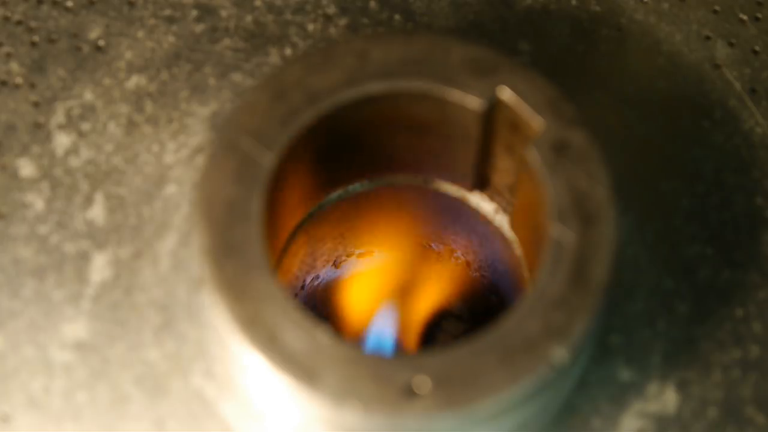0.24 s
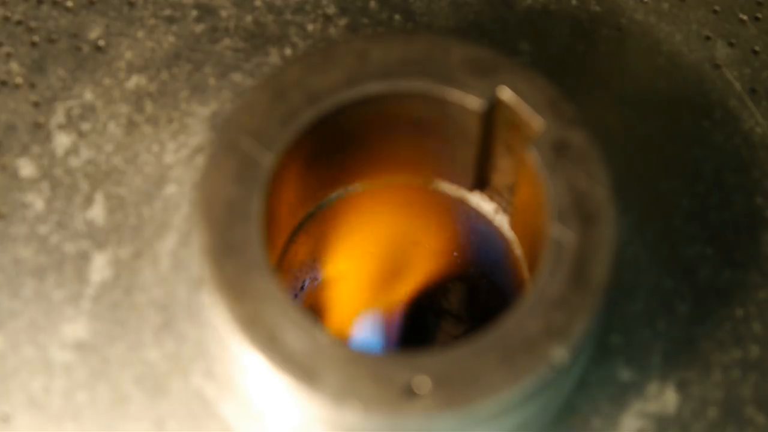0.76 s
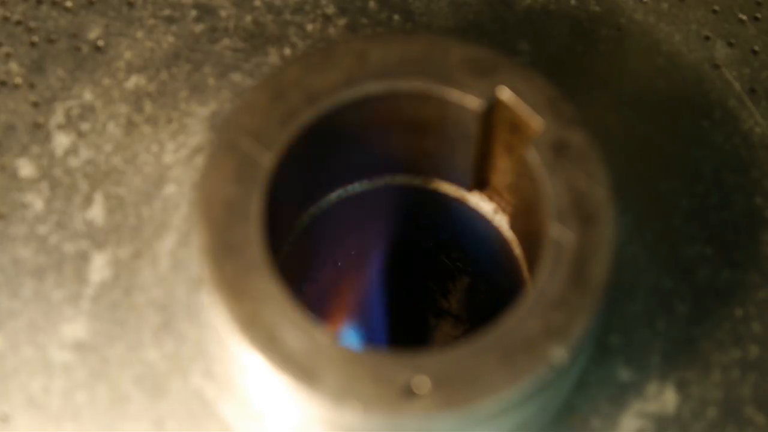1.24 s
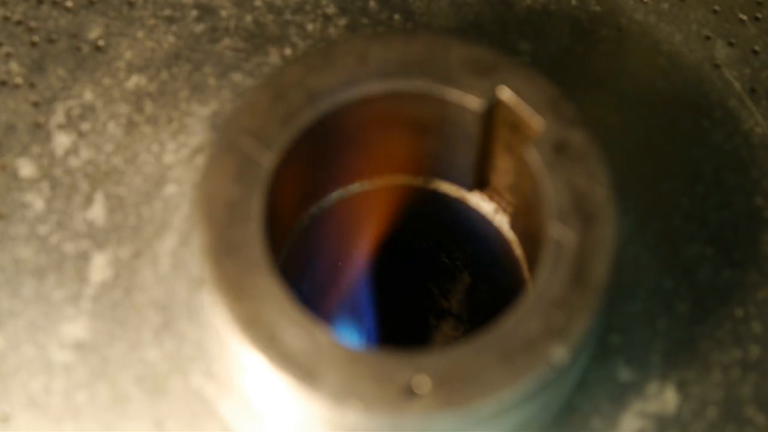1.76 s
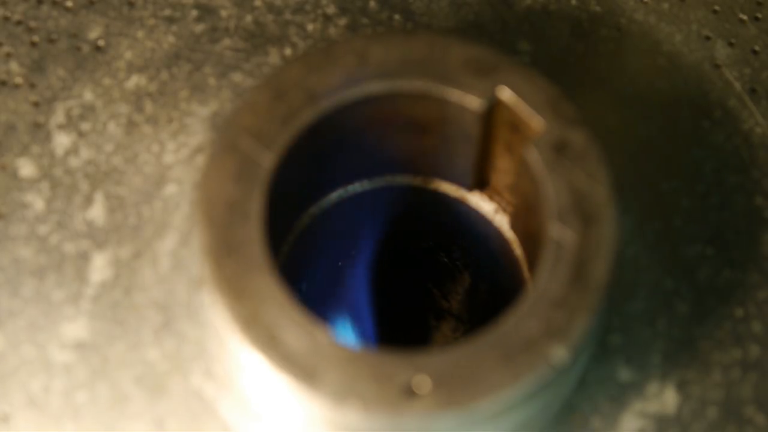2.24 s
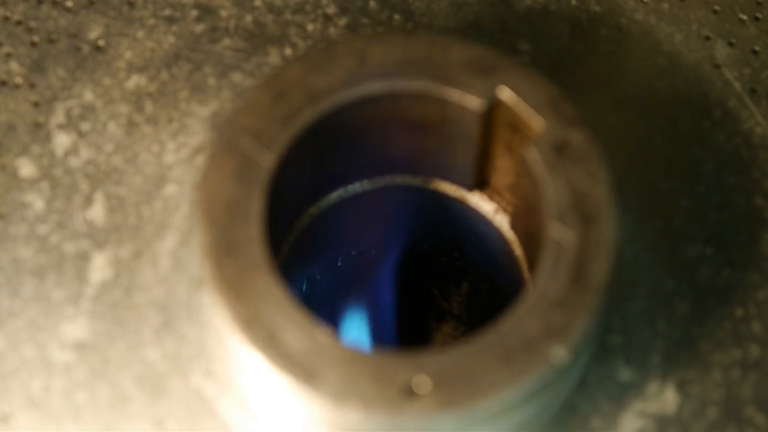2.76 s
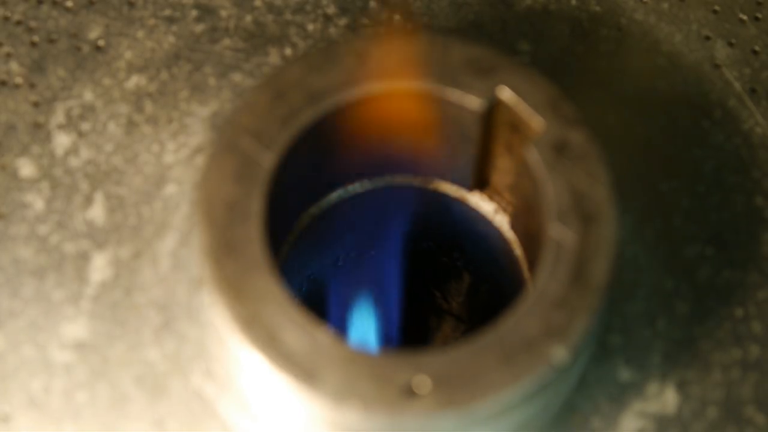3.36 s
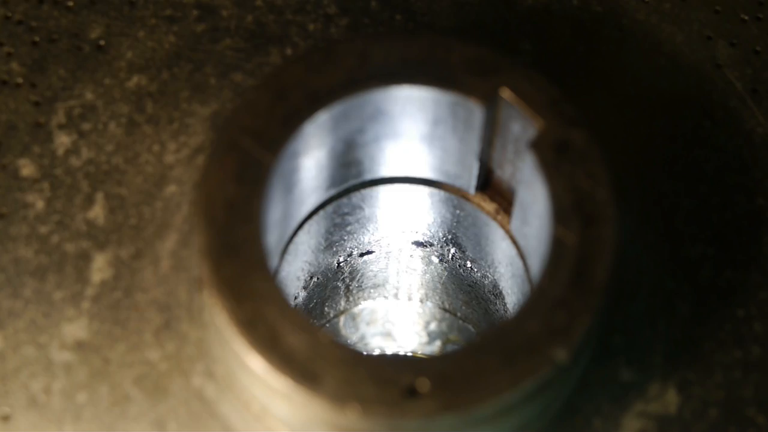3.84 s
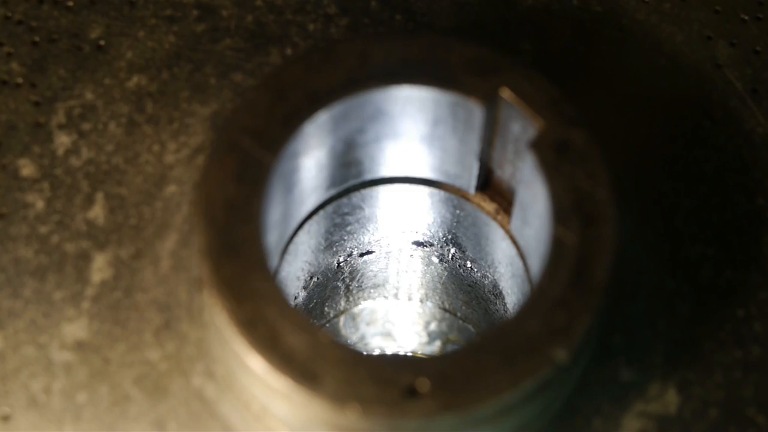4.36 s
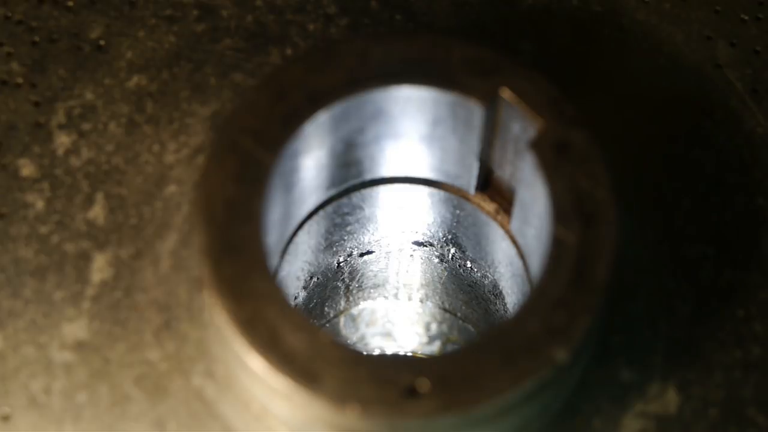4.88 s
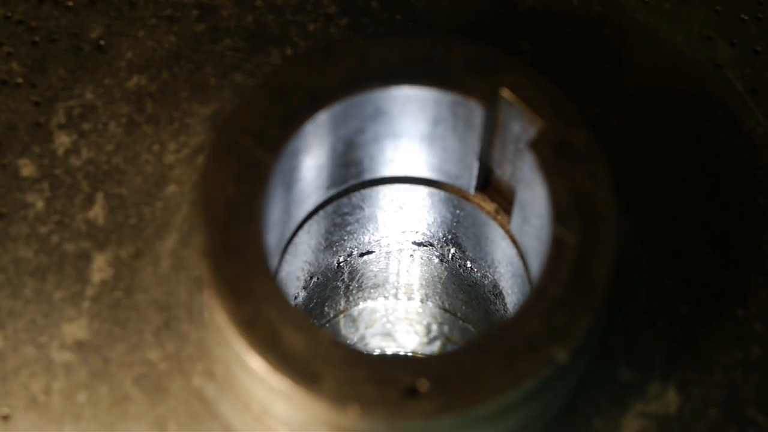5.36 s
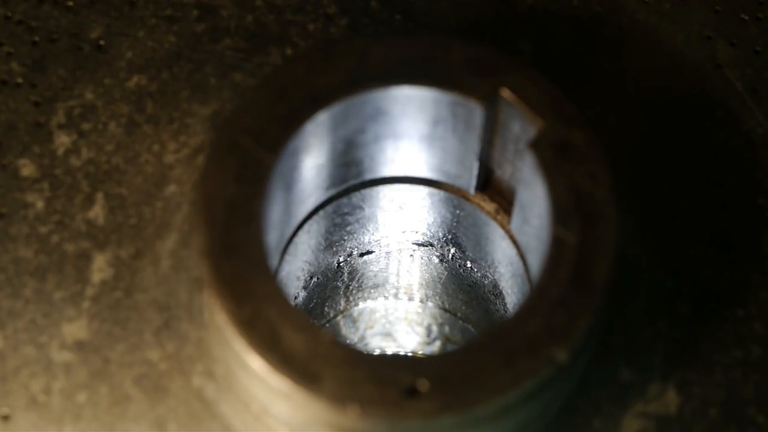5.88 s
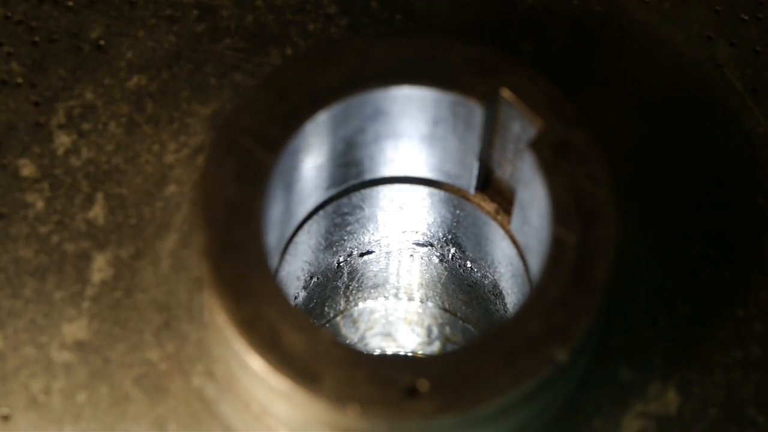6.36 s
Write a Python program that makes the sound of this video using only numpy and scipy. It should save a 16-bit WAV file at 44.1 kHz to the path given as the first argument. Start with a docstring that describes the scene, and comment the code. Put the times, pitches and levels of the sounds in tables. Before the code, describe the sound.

Close hollow torch roar with soft gas hiss and early oil crackles stops abruptly, leaving faint gas, two small clicks and room hush.

```python
"""In a quiet workshop, a gas torch burns close by, inside the bore of a cast-iron pulley. The flame is noise
ringing the hollow hub, swelling briefly at times; the gas jet is resonant hiss. Oily dirt flares up with soft
low puffs of air, small cracks and grainy, sizzling spits of noise. The sound of the flame breaks off abruptly;
a switch clicks (a tick of noise and a ringing housing), a trace of gas rushes on faintly, and the switch clicks
again over the room's wide hush."""
import sys
import numpy as np
from scipy import signal
from scipy.fft import rfft, irfft, next_fast_len
from scipy.io import wavfile
from scipy.ndimage import uniform_filter1d, map_coordinates

SR = 44100
rng = np.random.default_rng(int(sys.argv[2]) if len(sys.argv) > 2 else 0)


def store_pcm(level_fs):
    """Save levels as 16-bit WAV."""
    pcm = np.round(np.clip(level_fs, -1, 1) * 32767).astype(np.int16)
    wavfile.write(sys.argv[1], SR, np.atleast_2d(pcm).T)


N = 291922  # length of the sound in samples
T = np.arange(N) / SR  # time in seconds
OPPOSITE = np.array([[1], [-1]])  # turns one sound into two channels of opposite sign, which sounds wide


def undb(db):
    """Turn decibels into gain."""
    return 10 ** (np.asarray(db) / 20)


def unit(x):
    """Scale a sound to an rms (average strength) of 1."""
    return x / np.sqrt(np.mean(x ** 2))


def noise(gain_at):
    """Make noise of rms 1, coloured by a function that gives the gain at each frequency."""
    size = next_fast_len(N)
    hz = np.maximum(np.fft.rfftfreq(size, 1 / SR), 1)
    spectrum = rfft(rng.standard_normal(size)) * gain_at(hz)
    return unit(irfft(spectrum, size)[:N])


def shaped(points):
    """Make noise of rms 1 whose spectrum runs smoothly through (Hz, dB) points."""
    point_hz, point_db = np.transpose(points)
    return noise(lambda hz: undb(np.interp(np.log(hz), np.log(point_hz), point_db)))


def resonant(modes):
    """Make turbulent noise of rms 1 that rings a set of steep (Hz, width in Hz, dB) resonances."""
    def gain_at(hz):
        power = 0
        for center, width, db in modes:
            detuning = (hz * hz - center * center) / (hz * width)
            power = power + undb(db) ** 2 / (1 + detuning ** 2) ** 2
        return np.sqrt(power)
    return noise(gain_at)


def walk(rate):
    """Make a random curve of rms 1: levels held for 1 / rate seconds, then smoothed twice."""
    hold = max(int(SR / rate), 1)
    steps = np.repeat(rng.standard_normal(N // hold + 1), hold)
    return unit(uniform_filter1d(uniform_filter1d(steps, hold), hold)[:N])


def fall(t, t60):
    """Fade exponentially, losing 60 dB in t60 seconds."""
    return np.exp(-np.log(1000) * t / t60)


def decay(start, t60, rise):
    """Rise quickly and fall exponentially, like anything that is struck."""
    out = np.zeros(N)
    live = (T > start) & (T < start + 2 * t60)
    t = T[live] - start
    out[live] = (1 - np.exp(-t / rise)) * fall(t, t60)
    return out


def mode(start, hz, t60, rise):
    """Ring one struck resonance: a sine of random phase that dies away."""
    return decay(start, t60, rise) * np.sin(2 * np.pi * (hz * T + rng.random()))


def echo(x, t60, wet_db, channels):
    """Add a diffuse echo, a noise tail that starts after a millisecond and fades at the rate of t60."""
    t = T[:SR // 2]
    tail = rng.standard_normal((channels, len(t))) * fall(t, t60) * (t > .001)
    tail /= np.sqrt(np.sum(tail ** 2, axis=1, keepdims=True))
    return x + undb(wet_db) * signal.fftconvolve(np.atleast_2d(x), tail, axes=1)[:, :N]


# Moments when the flame flares with a soft puff.
# Each row: peak in seconds, level in dB, half length in seconds (where the swell is down to 1/e).
PUFFS = [(0.12, -57, 0.019), (0.287, -64, 0.014), (0.505, -54.5, 0.055), (0.657, -57.5, 0.11),
         (0.77, -56, 0.058), (0.943, -51, 0.031), (1.387, -55, 0.024), (1.609, -55, 0.019),
         (2.35, -61, 0.037), (3.27, -59, 0.055), (3.403, -63, 0.026), (3.564, -56.5, 0.014),
         (3.696, -56, 0.0094)]


def flares():
    """Swell with each flare of the flame: smooth bells in time."""
    return sum(undb(db) * np.exp(-((T - peak) / half) ** 2) for peak, db, half in PUFFS)


SWELL_RISE_S, SWELL_T60_S = 0.0017, 0.02
DIP_DB, DIP_S, DIP_LEAD_S = -2, 0.011, 0.002  # depth, half length and lead of the dip
# Moments when the roar dips slightly, then swells briefly at the hub's strongest resonances.
# Each row: start in seconds, strength in dB against the steady roar, seconds from start to release.
SWELLS = [(0.187, -1, .016), (0.334, -0.5, .008), (0.479, 2.5, 0.0048), (0.536, 2, .01),
          (0.6396, 6, 0.0022), (0.6712, 3, .012), (0.91, 0.5, 0.0076), (1.07, 1, 0.0057),
          (1.1433, 3, 0.0065), (1.3304, 0, 0.0073), (1.471, 3, 0.0057), (1.603, 4.5, 0.0094),
          (1.814, 5, .006), (2.081, -0.5, 0.004), (2.33, -1, 0.0055), (2.367, 3.5, 0.0027),
          (2.415, 3.5, 0.0053), (2.4534, 2, 0.017), (2.5082, 1.5, 0.0053), (2.6918, 3, 0.0075),
          (3.3024, 7.5, 0.005), (3.5528, 5.5, 0.0086), (3.571, -1, 0.0078), (3.695, 4, 0.0046)]


def swells():
    """Give the push of each swell (attack, hold, release) and, in dB, the dip of the roar at its start."""
    push, dip_db = np.zeros((2, N))
    for start, db, length in SWELLS:
        age = np.clip(T - start, 0, 1)
        attack = 1 - np.exp(-age / SWELL_RISE_S)
        release = fall(np.maximum(age - length, 0), SWELL_T60_S)
        push += undb(db) * attack * release
        distance = (T - start + DIP_LEAD_S) / DIP_S
        dip_db += DIP_DB * np.exp(-np.minimum(distance ** 2, 20))
    return push, dip_db


# Band of the hub's strongest resonances, where the roar swells: lower and upper limit in Hz.
SWELL_BAND_HZ = (1090, 1383)


def swelling(ring, low_share=0.195, hub_hz=(750, 1800)):
    """Let the roar dip, then add an even, brief swell at the hub's strongest resonances."""
    push, dip_db = swells()
    upper_band = signal.butter(2, SWELL_BAND_HZ, "band", fs=SR, output="sos")
    upper = signal.sosfiltfilt(upper_band, ring)
    # keeping only the phase of the ringing gives an even strength
    phase = np.angle(signal.hilbert(upper, next_fast_len(N))[:N])
    swell = push * np.sqrt(2) * np.cos(phase)
    swell = signal.sosfiltfilt(signal.butter(2, hub_hz, "band", fs=SR, output="sos"), swell)
    # outside the band the dip has only a share of its depth in dB
    return undb(low_share * dip_db) * (ring - upper) + undb(dip_db) * upper + swell


FLAME_DB = -25  # average level of the roar, before surges, flares and swells
SURGE_DB, SURGE_PER_S = 0.56, 17  # rms size and rate of the random surges
FLARE_LIFT_DB = 0.6  # the strongest flare lifts the roar by this much
# Resonances of the flame in the burner tube and hub.
# Each row: frequency in Hz, width in Hz, relative level in dB.
HUB = [(175.3, 42, -30), (282.8, 73, -16), (347, 68, -16), (476.4, 115, -16.5), (548, 49, -13.5),
       (621.5, 40, -11.5), (690.5, 117, -12), (727.6, 29, -13), (817, 37.5, -18.5), (850, 18, -11),
       (917, 43, -14), (975, 79, -13), (1065, 17.6, -4.5), (1100.5, 63, -9), (1159, 25, -8),
       (1225.2, 52.8, -0.5), (1284.5, 37, -6.5), (1290, 97, -11.5), (1440, 124, -16), (1588, 78, -22.5),
       (1628, 18, -21), (1744, 140, -33.5)]


def roar(flutter_db=1.0, flutter_rate=45, scatter_db=-44):
    """Ring the hub with the fluttering flame, with brief swells; a little scatters from the sides."""
    ring = resonant(HUB)
    ring /= np.sqrt(uniform_filter1d(ring ** 2, SR // 12))  # the gas supply holds the mean power steady
    flare = flares()
    burn_db = FLARE_LIFT_DB * flare / flare.max()
    burn_db = burn_db + SURGE_DB * walk(SURGE_PER_S) + flutter_db * walk(flutter_rate)
    scattered = shaped([(60, -43.0), (280, -18.0), (550, -6.5), (740, -0.5), (950, 4.0), (1150, 6.5),
                        (1400, -1), (1750, -8), (2200, -27.0), (4000, -65.0)])
    return undb(FLAME_DB) * swelling(undb(burn_db) * ring) + undb(scatter_db) * scattered * OPPOSITE


NOZZLE_WANDER, NOZZLE_WANDER_PER_S = .014, 22  # share by which the resonances drift (rms), and its rate
SWELL_HISS_DB = 0.7  # the hiss lifts with each swell of the roar, per unit of push
# Resonances of the gas jet in the nozzle.
# Each row: frequency in Hz, width in Hz, relative level in dB per Hz of width.
NOZZLE = [(1970, 1900, -14), (2470, 860, -8), (3097, 430, 0.1), (4008, 430, -3.5), (4610, 500, -8.5),
          (5215, 660, -9.5), (6200, 1500, -17), (8320, 2100, -20), (9900, 2000, -22.5), (12100, 4500, -25)]
# Level of the hiss, which eases off.
# Each row: time in seconds, level in dB before flicker and swells.
HISS_DB = [(0, -45.5), (1.3, -46.5), (2.0, -47), (3.2, -46.5), (3.85, -49)]


def jet(flicker_db=0.74, own_flicker_db=1.23, side_db=-5.0):
    """Hiss through drifting, flickering nozzle resonances; near iron combs it, far walls widen it."""
    hiss = np.zeros(N)
    for hz, width, db in NOZZLE:
        flicker = undb(db + own_flicker_db * walk(30.11))
        hiss += flicker * np.sqrt(width) * resonant([(hz, width, 0)])
    # reading the hiss slightly early or late bends its pitch
    drift = np.cumsum(NOZZLE_WANDER * walk(NOZZLE_WANDER_PER_S))
    hiss = map_coordinates(hiss, [np.arange(N) + drift], order=3, mode="mirror")
    direct = unit(echo(hiss, t60=0.1, wet_db=-7.0, channels=1))
    reflected = shaped([(900, -37.5), (1800, -2), (2500, 0.5), (4200, -1.5), (5500, -3.5), (7000, -7.5),
                        (10000, -11), (14000, -17.0), (15500, -18.0)])
    push, _ = swells()
    flow_db = np.interp(T, *np.transpose(HISS_DB)) + flicker_db * walk(60) + SWELL_HISS_DB * push
    return (direct + undb(side_db) * reflected * OPPOSITE) * undb(flow_db)


def puffs(rumble_db=-85):
    """Push out a little low-pitched air with each flare, over the flame's faint rumble."""
    air = shaped([(5, -12), (20, -1), (60, 0.5), (110, -2.0), (200, 2.0), (600, -44), (2000, -90)])
    return air * (flares() + undb(rumble_db))


# Hush of the workshop, the part common to both channels.
# Each row: frequency in Hz, relative level in dB per Hz.
HUSH_MID = [(30, -25), (100, -22.5), (170, -17.5), (240, -7.5), (330, -3.5), (550, 0), (800, 0),
            (1300, -4.5), (2000, -6.5), (4000, -10.5), (7000, -16), (10000, -20), (15500, -27.5)]
# The part of the hush that is opposite in the two channels.
# Each row: frequency in Hz, relative level in dB per Hz.
HUSH_SIDE = [(30, -23), (100, -32), (170, -25), (240, -23.5), (330, -9.5), (550, -4.5), (850, -2.5),
             (1400, -4.5), (2000, -6), (4000, -13), (7000, -21), (10000, -27), (15500, -36)]


def hush(mid_db=-59.5, side_db=-52, waver_db=0.8):
    """Fill the background with wide, gently wavering air noise."""
    air = undb(mid_db) * shaped(HUSH_MID) + undb(side_db) * shaped(HUSH_SIDE) * OPPOSITE
    return air * undb(waver_db * walk(11.0))


SPIT_RISE_S, SPIT_T60_S = 0.0026, 0.067  # every spit bursts and dies alike
SIMMER_DB, SIMMER_LEAD_S, SIMMER_TAIL_S = -36, 0.013, 0.062  # fizz around each spit; time constants


def spit_shape(start):
    """Follow a drop of oil as it begins to fizz, bursts, and fizzes out."""
    age = T - start
    simmer = np.exp(-np.maximum(-age / SIMMER_LEAD_S, age / SIMMER_TAIL_S))
    return decay(start, SPIT_T60_S, SPIT_RISE_S) + undb(SIMMER_DB) * simmer


# the sizzle is partly separate tiny bursts: their rate, time constant and share of the power
CRACKLE_PER_S, CRACKLE_LIFE_S, CRACKLE_SHARE = 450, 0.00049, .42


def crackle():
    """Give the ragged strength of a sizzle: tiny bubbles bursting at random over an even fizz."""
    pops = 1. * (rng.random(N) < CRACKLE_PER_S / SR)
    power = signal.lfilter([1], [1, -np.exp(-1 / (CRACKLE_LIFE_S * SR))], pops)
    return np.sqrt(1 - CRACKLE_SHARE + CRACKLE_SHARE * power / power.mean())


CRACK_RISE_S, CRACK_T60_S = 0.00026, 0.0041  # the skin of the drop bursts first
CRACK_BRIGHTNESS = 0.46  # share of a spit's treble setting in dB that its crack has too
# Colour of a spit in the bore.
# Each row: frequency in Hz, width in Hz, relative level in dB.
SIZZLE = [(3180, 810, -12.5), (3780, 130, -0.5), (4992, 12600, -2.5), (6160, 620, 3), (8300, 2330, -2.5),
          (10330, 1000, -0.5), (11700, 2300, -0.5), (14600, 2000, -20)]
# Brief ringing of the bore after each crack.
# Each row: frequency in Hz, level in dB against the crack setting, time to fall by 60 dB in seconds.
BORE = [(3130, -10, 0.016), (3950, -10.5, 0.03), (6370, -13, 0.015)]
# Oil spitting on hot iron.
# Each row: start in seconds, sizzle level in dB, its treble against its body in dB, opening crack in dB.
SPITS = [(0.1167, -29.5, -9, -30), (0.291, -42, -4.5, -45.5), (0.4702, -30, -1, -34),
         (0.4759, -20.5, -4.5, -15), (0.482, -38, -5, -32), (0.498, -48, -2, -38.5), (0.513, -47.5, 4, -43),
         (0.5378, -33, -18.5, -31), (0.622, -46, 6, -50), (0.639, -49, 1.5, -42.5),
         (0.6525, -24.5, -3.5, -26), (0.659, -35, 1, -27.5), (0.6698, -31.5, -1, -29), (0.684, -36, 6, -30),
         (0.6923, -31.5, 14.5, -17), (0.698, -46, 16.5, -30), (0.7115, -51, 11, -46), (0.8939, -49, 8, -48),
         (0.9284, -38.5, -2, -33), (0.936, -37, -3, -42), (1.392, -50, 2, -37), (1.603, -51, 3, -37),
         (1.611, -55, 1, -46), (3.2326, -27.5, -28, -25.5)]


def spits(side_db=-6, split_hz=5500, crack_treble_db=-3):
    """Crack open droplets of oil that ring the bore and sizzle in grains, some bright and some dull."""
    sizzle = resonant(SIZZLE) + undb(side_db) * resonant(SIZZLE) * OPPOSITE
    snap = sizzle / np.sqrt(uniform_filter1d(sizzle ** 2, size=24))  # a crack is one solid burst
    lowpass = signal.butter(2, split_hz, fs=SR, output="sos")
    body = signal.sosfiltfilt(lowpass, sizzle)
    snap_body = signal.sosfiltfilt(lowpass, snap)
    # strength over time of the body and treble of sizzles and cracks, and the blows to the bore
    low, high, crack_low, crack_high, blows = np.zeros((5, N))
    for start, db, treble_db, crack_db in SPITS:
        fizz = undb(db) * spit_shape(start)
        crack = undb(crack_db) * decay(start, CRACK_T60_S, CRACK_RISE_S)
        low += fizz
        high += undb(treble_db) * fizz
        crack_low += crack
        crack_high += undb(crack_treble_db + CRACK_BRIGHTNESS * treble_db) * crack
        blows[int(start * SR)] += undb(crack_db)
    bore = sum(undb(db) * mode(0, hz, t60, CRACK_RISE_S) for hz, db, t60 in BORE)[:SR // 10]
    cracks = crack_low * snap_body + crack_high * (snap - snap_body)
    cracks = cracks + signal.fftconvolve(blows, bore)[:N]
    sizzles = crackle() * (low * body + high * (sizzle - body))
    return echo(sizzles + cracks, t60=0.43, wet_db=-13.0, channels=2)


CLICK_WET_DB, CLICK_T60_S = -18.5, 0.36  # level and fading time of the echo
BUILD_S, BUILD_CYCLES = 0.0006, 1.5  # a mode builds up as the blow spreads, the low ones last
# Colour of the tick.
# Each row: frequency in Hz, relative level in dB per Hz.
TICK = [(30, -26), (150, -19), (300, -17), (420, -9), (900, -2), (1300, -1.5), (2000, -2), (2800, -7),
        (3500, -4.5), (5500, -6), (6500, -15), (8600, -20), (10000, -20), (12000, -21), (15500, -34)]
# Ringing modes of the switch housing.
# Each row: frequency in Hz, time to fall by 60 dB in seconds, relative dB in the first click and the second.
HOUSING = [(420.6, 0.089, -6.5, -2.5), (480, 0.063, -1.5, 0), (564, .045, 0.5, 1), (686, 0.056, -10, -14),
           (771, 0.053, -1, 2), (828, .055, 1.5, 1.5), (933, 0.065, -18, -6), (1035, 0.084, -6, -8),
           (1390, 0.11, -12, -9.5), (1690, 0.038, 0, -2), (2020, .045, -17, -17), (2310, .05, -11, -15),
           (2680, 0.047, -3, -3), (2884, 0.037, -7, -1.5), (3280, 0.041, -17, -21), (4140, 0.059, -24, -8),
           (4380, .048, -12, -19), (4667, .052, -7, -17), (5500, .028, -15, -2), (7350, .035, -15, -22),
           (9900, 0.034, -13, -14)]
# Switch clicks, a tick and then the snap.
# Each row: start in seconds, tick level in dB, snap level in dB, delay of the snap in seconds.
CLICKS = [(3.9071, -31, -27.5, 0.0006), (5.0668, -29.5, -28, 0.0012)]


def clicks(side_db=-3, tick_t60=0.073, rise=0.001, lowest_hz=380):
    """Tick the catch, then snap the switch home, ringing its housing a little differently each way."""
    out = np.zeros((2, N))
    small_body = signal.butter(8, lowest_hz, "high", fs=SR, output="sos")  # too small to radiate bass
    for k, (start, tick_db, snap_db, delay) in enumerate(CLICKS):
        tick = shaped(TICK) + undb(side_db) * shaped(TICK) * OPPOSITE
        out += undb(tick_db) * decay(start, tick_t60, rise) * tick
        ring = np.zeros(N)
        for hz, t60, *db in HOUSING:
            ring += undb(db[k]) * mode(start + delay, hz, t60, BUILD_S + BUILD_CYCLES / hz)
        out += undb(snap_db) * signal.sosfilt(small_body, ring)
    return echo(out, t60=CLICK_T60_S, wet_db=CLICK_WET_DB, channels=2)


# the last of the gas swells, holds and dies away
LAST_GAS_S, LAST_GAS_DB = 3.98, -57
LAST_GAS_ATTACK_S, LAST_GAS_HOLD_S, LAST_GAS_T60_S = 0.047, 0.29, 0.78


def last_gas():
    """Rush a faint, soft trace of gas through the hub's resonances."""
    age = T - LAST_GAS_S
    attack = np.clip(age / LAST_GAS_ATTACK_S, 0, 1)
    release_age = np.maximum(age - LAST_GAS_ATTACK_S - LAST_GAS_HOLD_S, 0)
    flow = attack * fall(release_age, LAST_GAS_T60_S)
    rush = resonant([(563, 270, -3.0), (880, 96, -2.0), (1110, 89, 5.0), (1250, 110, 0.5), (1800, 1100, -15)])
    return undb(LAST_GAS_DB) * flow * rush


FLAME_OUT_S = 3.85  # the flame is silent from here on


def scene():
    """Play the burning torch, then the quiet workshop with two clicks and a trace of gas."""
    burning = np.clip((FLAME_OUT_S - T) / 0.0038, 0, 1)  # stops within 3.8 ms
    flame = burning * (roar() + jet() + puffs() + spits())
    return flame + last_gas() + clicks() + hush()


TOP_HZ = 15800


def record(dry):
    """Cut the top of the treble with a steep low-pass filter."""
    return signal.sosfilt(signal.ellip(10, .1, 80, TOP_HZ, fs=SR, output="sos"), dry)


dry = scene()
out = record(dry)
store_pcm(out)
```